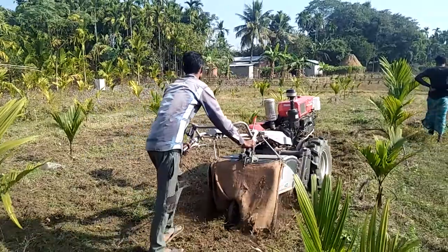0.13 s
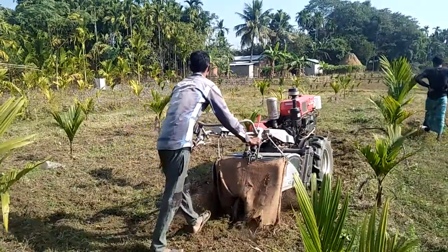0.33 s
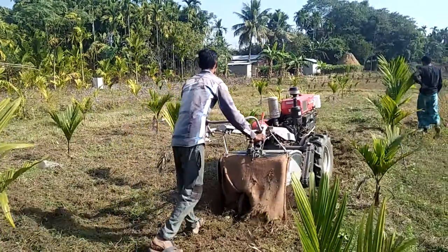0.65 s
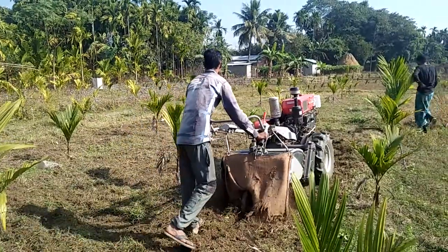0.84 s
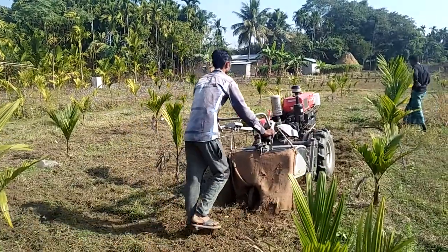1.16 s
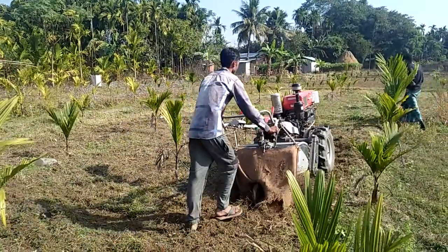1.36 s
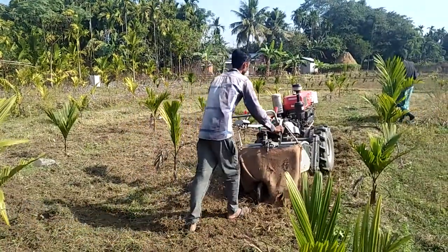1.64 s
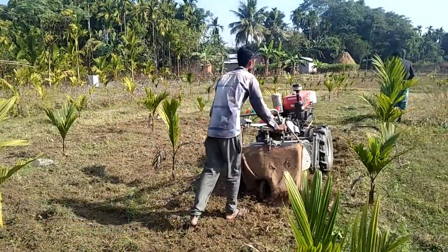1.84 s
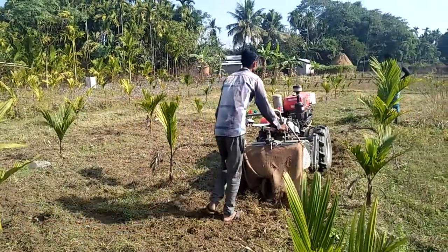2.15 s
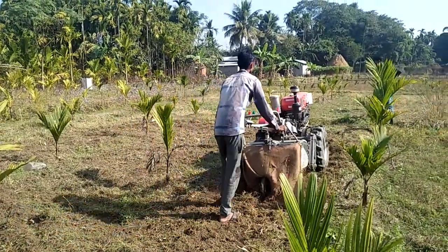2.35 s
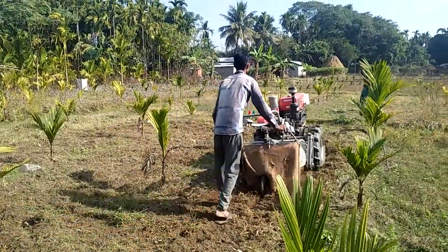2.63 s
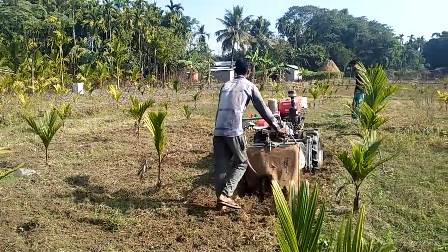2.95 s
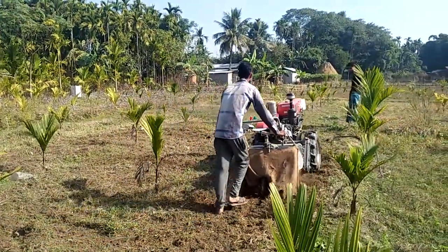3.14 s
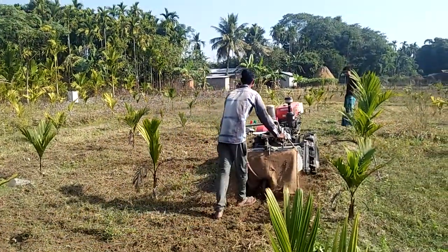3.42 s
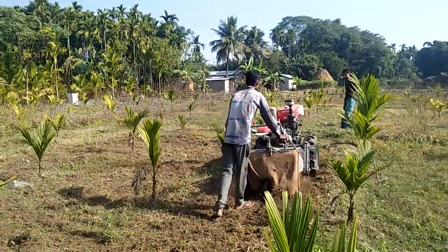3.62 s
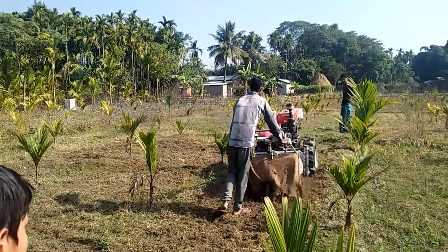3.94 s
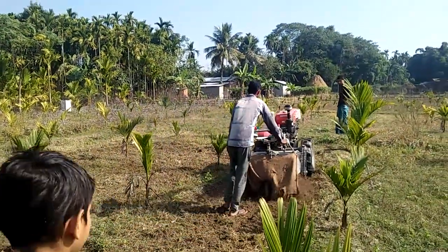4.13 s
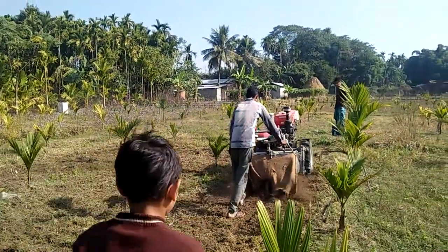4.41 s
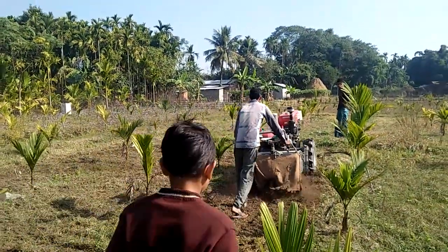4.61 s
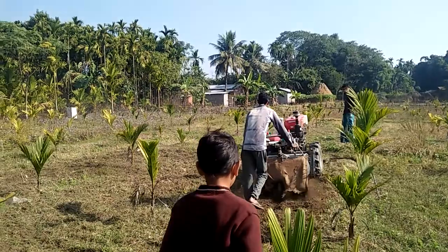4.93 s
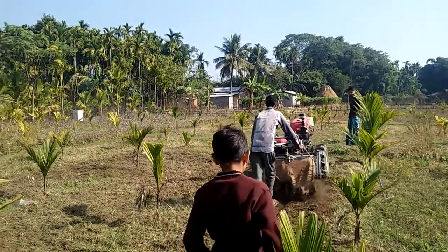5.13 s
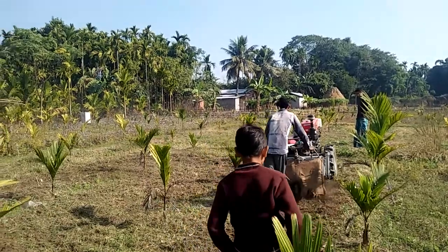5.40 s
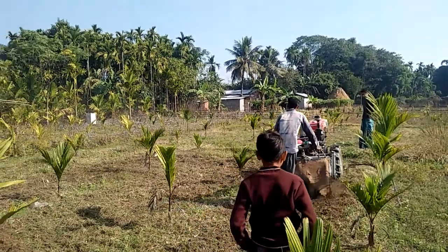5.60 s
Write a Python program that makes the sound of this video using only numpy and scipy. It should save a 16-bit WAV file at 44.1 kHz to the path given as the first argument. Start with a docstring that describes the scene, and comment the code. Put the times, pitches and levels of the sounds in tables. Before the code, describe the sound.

Outdoors on soft soil, a walking tiller's diesel idles evenly with metallic knock, valve ticks and low puffs. It is suddenly revved, growing louder, faster and raspier for about two seconds, then fuel is cut and it slows, leaving loose rattle, a rough whine and hollow intake pops. Dry open air, handheld phone a few metres behind, level gently falling as it moves off.

```python
"""A single-cylinder diesel power tiller idles in a field a few metres off, is revved up, then its throttle shuts.
Impulses timed by one crank ring mode banks and shaped noise: intake gulps, valve taps, a combustion knock in
the block and an exhaust thump with a spit of gas. Timing gears whine as a roughened sine, chassis and tines
rattle as grainy noise, and a notch hollows out the low mids as the soft ground does. The level falls slowly
as the tiller moves off."""
import sys
import numpy as np
from scipy import signal
from scipy.fft import rfft, irfft
from scipy.io import wavfile

SR = 44100
rng = np.random.default_rng(int(sys.argv[2]) if len(sys.argv) > 2 else 0)


def unload_wav(signal):
    """Save mono or channel-first audio to the path in sys.argv[1] as 16-bit WAV at rate SR, clipped to [-1, 1]."""
    wavfile.write(
        sys.argv[1],
        SR,
        np.round(np.clip(np.atleast_2d(signal).T, -1, 1) * 32767).astype(np.int16),
    )


N = 254016
TIME = np.arange(N) / SR
RING = TIME[:6000]  # time axis of one impulse response

OPEN_AT_S = 2.27  # the throttle begins to open
IDLE_HZ = 10.103  # firings per second at the start
KNOCK_ANGLE = -.236  # cycles after the exhaust thump

# modes of the engine block and its covers: (frequency [Hz], relative level [dB])
BLOCK_MODES = [(466, -10.2), (563, -8.1), (611, -6.0), (700, 0.0), (759, -3.7), (824, -7.0), (947, -6.8),
               (1042, -8.9), (1109, -11.5), (1157, -8.7), (1257, -4.7), (1359, -7.6), (1402, -8.9),
               (1470, -8.8), (1631, -11.1), (1701, -15.3), (1768, -12.9), (1846, -8.0), (1916, -15.8),
               (1978, -17.6), (2081, -14.9), (2137, -10.8), (2256, -9.3), (2425, -18.6), (2479, -20.0),
               (2544, -15.8), (2592, -17.9), (2705, -21.7)]
# colour of rattling metal: (frequency [Hz], relative level [dB])
RATTLE_COLOUR = [(200, -4.5), (430, 0), (620, -3.5), (850, -1), (1050, 2), (1250, -4), (1650, 0.5),
                 (2000, -1), (2450, -3.5), (3300, -19.5), (4300, -35.5), (8000, -27)]
# colour of bright metallic ticks: (frequency [Hz], relative level [dB])
TICK_COLOUR = [(1940, -1), (3300, -9.5), (4020, -14.5), (4360, -23), (6880, -4.5), (7290, -1.5), (8060, 2),
               (8640, -4), (9870, 0), (12300, -11.5), (13400, -9), (14500, -33), (15000, -71)]


def undb(db):
    """Decibels to gain."""
    return 10 ** (np.asarray(db) / 20)


def noise(colour):
    """Noise of rms 1 with a spectrum of (frequency [Hz], level [dB]) points."""
    hz, db = np.transpose(colour)
    f = np.maximum(np.fft.rfftfreq(N, 1 / SR), 1)
    gain = undb(np.interp(np.log(f), np.log(hz), db))
    y = irfft(rfft(rng.standard_normal(N)) * gain, N)
    return y / y.std()


def wide(colour, side_db=-11):
    """Stereo noise whose treble differs a little between left and right."""
    treble = signal.butter(10, 4700, "high", fs=SR, output="sos")
    side = signal.sosfilt(treble, noise(colour))
    return noise(colour) + undb(side_db) * side * np.array([[1], [-1]])


def chatter(depth_db=3):
    """Loose parts touch and part, so their rattle comes in grains."""
    flutter = noise([(1, 8.5), (60, 8.5), (200, -11), (900, -57)])
    return undb(depth_db * flutter - depth_db / 2)


def blows(crank, angle, db, uneven=False):
    """One impulse each time the crank passes an angle; loose parts strike less evenly."""
    at = np.flatnonzero(np.diff(np.floor(crank - angle)) > 0)
    scatter_db = 1.5 if uneven else .45
    train = np.zeros(N)
    train[at] = undb(scatter_db * rng.standard_normal(len(at)))
    return train * undb(db)


def ring(train, response):
    """Every impulse sets off the response."""
    return signal.fftconvolve(train, response)[:N]


def delay(x, seconds):
    """The same sound, later."""
    return np.interp(TIME - seconds, TIME, x, left=0)


def burst(rise_s, decay_s):
    """Envelope that swells and dies away; peak 1."""
    y = (1 - np.exp(-RING / rise_s)) ** 2 * np.exp(-RING / decay_s)
    return y / y.max()


def cavity(modes, soft_s):
    """Response of an air cavity to a puff that lasts about soft_s; peak 1."""
    y = sum(undb(db) * np.exp(-np.pi * width * RING) * np.cos(2 * np.pi * hz * RING)
            for hz, width, db in modes)
    puff = RING * np.exp(-RING / soft_s)
    y = signal.fftconvolve(y, puff)[:len(RING)]
    return y / np.abs(y).max()


def metal(train, table, t60, vary, tilt_db=0, rise_s=.0006):
    """Blows ring a casting or shell; high modes die sooner, and each blow shares its energy differently."""
    hz, db = np.transpose(table)
    gain = undb(db) / np.sqrt(np.sum(undb(db) ** 2) / 2)
    damping = np.log(1000) / t60 * np.sqrt(hz / hz.mean())  # t60 [s] holds at the mean frequency
    modes = np.exp(np.outer(2j * np.pi * hz - damping, RING)) * (1 - np.exp(-RING / rise_s))
    tilt = np.broadcast_to(tilt_db, N)  # dB per octave
    usual = np.exp(2j * np.pi * rng.random(len(hz)))
    out = np.zeros(N + len(RING))
    for i in np.flatnonzero(train):
        chance = rng.standard_normal((2, len(hz)))
        share = usual + vary * (chance[0] + 1j * chance[1])
        colour = gain * undb(tilt[i] * np.log2(hz / hz.mean()))
        out[i:i + len(RING)] += train[i] * ((colour * share) @ modes).imag
    return out[:N] / np.hypot(1, np.sqrt(2) * vary)


def throttle():
    """Fuel over time: 0 at idle, pushed quickly to 1, then eased back to -1, which is shut."""
    opening_s, close_at_s, closing_s = .14, 4.456, .476
    moves_s = [OPEN_AT_S, OPEN_AT_S + opening_s, close_at_s, close_at_s + closing_s]
    return np.interp(TIME, moves_s, [0, 1, 1, -1])


def flywheel(fuel):
    """Firings per second: fuel speeds the flywheel up, ever less eagerly; without fuel, drag slows it."""
    creep_hz_per_s = .055  # the idle creeps up until the throttle opens
    pull_hz_per_s, pull_fade_s, drag_hz_per_s = 3.362, 7.83, 2.84
    pull = pull_hz_per_s * np.exp((OPEN_AT_S - TIME) / pull_fade_s)
    idle = IDLE_HZ + creep_hz_per_s * np.minimum(TIME, OPEN_AT_S)
    return idle + np.cumsum(fuel * np.where(fuel > 0, pull, drag_hz_per_s)) / SR


def effort(fuel, firing_hz):
    """Levels of knock, thump, spit and clatter: fuel sets them, speed shifts them, high revs soften the knock."""
    # strength of each part before its own trims: (fuel shut [dB], idle [dB], full fuel [dB],
    # change with speed above idle [dB per Hz])
    knock_levels = (-42, -22, -21.5, -0.34)
    thump_levels = (-33.5, -23.5, -17.5, 0.4647)
    spit_levels = (-46.5, -42, -22, 0.49)
    clatter_levels = (-43.5, -44, -41, 0.12)
    falters, fade = -.33, .37  # fuel below which firing falters, and how much less stops it
    soften_above_hz, soften_db_per_hz = 13.6, 2
    wander_db = .4  # no two charges burn alike

    faster_hz = firing_hz - IDLE_HZ
    steps = [falters - fade, falters, 0, 1]
    knock, thump, spit, clatter = (
        np.interp(fuel, steps, [shut, idle, idle, full]) + per_hz * faster_hz
        for shut, idle, full, per_hz in (knock_levels, thump_levels, spit_levels, clatter_levels))
    softer = soften_db_per_hz * np.maximum(firing_hz - soften_above_hz, 0)
    wander = wander_db * noise([(1, 0), (5, 0), (15, -60)])
    return knock - softer + wander, thump, spit, clatter


def chassis(thump_db):
    """Chain, frame and tines in the soil rattle on, a little more under load."""
    rattle = undb(-42) * noise(RATTLE_COLOUR) + undb(-49) * wide(TICK_COLOUR)
    rumble = undb(-50.5) * noise([(15, -39), (60, 7.5), (130, -10), (280, -12.5), (600, -5), (3000, -75)])
    load_gain = undb(0.37 * np.maximum(thump_db + 33.5, 0))
    return (chatter() * rattle + rumble) * load_gain


def gears(crank, fuel, firing_hz):
    """Timing gears whine at their meshing rate, most at a case resonance and on the overrun; backlash roughens it."""
    teeth = 46  # meshing per engine cycle
    whine_db = -47
    case_hz, case_width_hz, case_db = 605, 45, -36
    overrun_at_s, overrun_rise_s, overrun_db = 5.29, 0.063, -37.5

    detune = (teeth * firing_hz - case_hz) / (case_width_hz / 2)
    resonance = undb(case_db) / (1 + detune ** 2)
    driven = (undb(whine_db) + resonance) * np.clip(1 + fuel, 0, 1)
    overrun = undb(overrun_db) * np.clip((TIME - overrun_at_s) / overrun_rise_s, 0, 1)
    backlash = 1 + 0.44 * noise([(1, -17), (30, 10), (150, -65)])
    # the shaft winds and unwinds (radians)
    twist = 0.31 * noise([(1, -12), (15, 3), (40, -8), (150, -62)])
    return (driven + overrun) * backlash * np.sin(2 * np.pi * teeth * crank + twist)


def intake(crank, thump_db):
    """The cylinder gulps air each cycle; with the fuel shut off it sucks back with a hollow pop instead."""
    # intake modes: (frequency [Hz], width [Hz], relative level [dB])
    gulp_modes = [(70.6, 160, 24), (133, 23, -21)]
    # hollow pipework modes: (frequency [Hz], width [Hz], relative level [dB])
    hollow_modes = [(136, 20, -5), (178, 46, 6.5), (259, 36.5, 3)]
    coasting = np.clip((-26 - thump_db) / 3, 0, 1)
    strokes = blows(crank, 0.183, 0)
    gulp = undb(-24.0) * ring(strokes * (1 - coasting), cavity(gulp_modes, soft_s=0.0012))
    pop = undb(-20.5) * ring(strokes * coasting, cavity(hollow_modes, soft_s=0.00093))
    return -(gulp + pop)  # suction: the pressure drops


def valves(crank, clatter_db):
    """Rockers and valves tap at fixed crank angles and shake the loose tinwork."""
    # taps of the valve gear: (angle [cycles after the exhaust thump], decay [s],
    # dull part relative level [dB], bright part relative level [dB])
    valve_taps = [(0.253, 0.018, 5.5, 7.5), (0.371, 0.027, -12, -1), (0.551, 0.0042, -20, -18)]
    dull, bright, taps = 0, 0, 0
    for angle, decay_s, dull_db, bright_db in valve_taps:
        train = blows(crank, angle, clatter_db, uneven=True)
        shake = ring(train, burst(rise_s=0.00013, decay_s=decay_s))
        dull = dull + undb(dull_db) * shake
        bright = bright + undb(bright_db) * shake
        taps = taps + undb(dull_db) * train
    tinwork = dull * noise(RATTLE_COLOUR) + bright * wide(TICK_COLOUR) * chatter()
    block = undb(-14) * metal(taps, BLOCK_MODES, t60=0.076, vary=0.19, tilt_db=-4)
    return tinwork + block


def combustion(crank, knock_db):
    """Diesel knock: the injector ticks, the pressure jump rings the block and sets its covers buzzing."""
    rise_s = .003  # the knock takes a moment to build as the charge burns
    train = blows(crank, KNOCK_ANGLE, knock_db)
    # off idle the pressure jump is steeper and favours the high modes
    firing_hz = np.gradient(crank) * SR
    tilt_db = 5 * np.clip(firing_hz - 10.1, 0, 1)
    knock = metal(train, BLOCK_MODES, t60=0.14, vary=0.31, tilt_db=tilt_db, rise_s=rise_s)
    buzz = ring(train, burst(rise_s=rise_s, decay_s=.009)) * noise(RATTLE_COLOUR)
    # the injector tick stays equally strong however hard the engine knocks, and fades only with a weak knock
    shots = blows(crank, KNOCK_ANGLE, np.minimum(knock_db, -28))
    tick = ring(shots, burst(rise_s=.0003, decay_s=.015)) * wide(TICK_COLOUR) * chatter()
    return undb(1.43) * knock + undb(-4.0) * buzz + undb(-2) * tick


def exhaust(crank, thump_db, spit_db):
    """A small puff as the valve cracks open, then the main charge; under load the pipe barks and gas spits."""
    # low modes of the silencer: (frequency [Hz], width [Hz], relative level [dB])
    silencer_modes = [(73, 99, -9), (107.3, 34.6, 12), (156, 95, -17.5)]
    # deep surge of a heavy charge: (frequency [Hz], width [Hz], relative level [dB])
    surge_modes = [(76.7, 30, 18), (182, 200, -46), (256, 26, 0)]
    # tailpipe modes, which bark under load: (frequency [Hz], width [Hz], relative level [dB])
    tailpipe_modes = [(464, 52, 2), (577.5, 29, 0), (890, 230, 1)]
    # colour of spitting gas: (frequency [Hz], relative level [dB])
    gas_colour = [(500, -47), (1200, -3), (2100, 5), (3000, -1), (4300, -15.5), (5400, -0.5), (6300, -1),
                  (7800, 5), (9800, 7), (11200, 2), (13000, -5), (14500, -16)]
    # modes of the silencer's steel shell: (frequency [Hz], relative level [dB])
    shell_modes = [(1460, 1), (1690, 2), (1950, 1), (2180, 3), (2400, -9), (2950, -2.5), (3350, -10.5)]

    early = crank + .0093 * np.gradient(crank) * SR  # 9.3 ms ahead at any speed
    opening = blows(early, 0, thump_db)
    charge = delay(opening, .0076)
    puffs = .35 * opening + charge
    # a heavy charge has a steep front and drives the silencer below its own note
    heavy = np.clip((thump_db + 25.5) / 8, 0, 1)
    thump = undb(4.5) * ring(puffs * (1 - 0.41 * heavy), cavity(silencer_modes, soft_s=0.0016))
    surge = undb(3) * ring(puffs * heavy, cavity(surge_modes, soft_s=0.0017))
    steep = (puffs + 0.22 * delay(charge, 0.02)) * (0.21 + 0.64 * heavy)
    bark = undb(8.5) * ring(steep, cavity(tailpipe_modes, soft_s=0.00019))
    jet = delay(blows(early, 0, spit_db, uneven=True), .009)
    spit = undb(4.5) * ring(jet, burst(rise_s=0.0011, decay_s=0.0043)) * wide(gas_colour)
    shell_blows = blows(crank, 0.0201, spit_db, uneven=True)
    shell = undb(-3.5) * metal(shell_blows, shell_modes, t60=0.052, vary=1.0)
    return thump + surge + bark + spit + shell


def scene():
    """The throttle drives the engine, one crank times its parts, and the tiller creeps away over soft soil."""
    start_angle = .165  # cycles after the exhaust thump
    near_db, recede_db_per_s = 0.4, 0.56
    fuel = throttle()
    firing_hz = flywheel(fuel)
    crank = start_angle + np.cumsum(firing_hz) / SR
    knock_db, thump_db, spit_db, clatter_db = effort(fuel, firing_hz)
    tiller = (chassis(thump_db) + gears(crank, fuel, firing_hz) + intake(crank, thump_db)
              + valves(crank, clatter_db) + combustion(crank, knock_db)
              + exhaust(crank, thump_db, spit_db))
    # the echo off soft soil cancels a narrow band: a fixed notch
    dip_hz, dip_width_hz = 360, 90
    notch = signal.iirnotch(dip_hz, dip_hz / dip_width_hz, fs=SR)
    return signal.lfilter(*notch, tiller) * undb(near_db - recede_db_per_s * TIME)


def record(dry):
    """The phone's microphone thins the deep bass and cuts the top."""
    gentle = signal.butter(2, 42, "high", fs=SR, output="sos")
    steep = signal.butter(4, 38, "high", fs=SR, output="sos")
    top = signal.ellip(8, .2, 90, 14500, fs=SR, output="sos")
    thin = signal.sosfiltfilt(steep, signal.sosfilt(gentle, dry))
    return signal.sosfilt(top, thin)


dry = scene()
out = record(dry)
unload_wav(out)
```